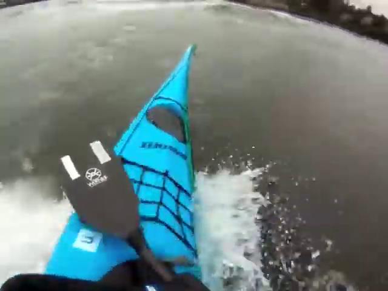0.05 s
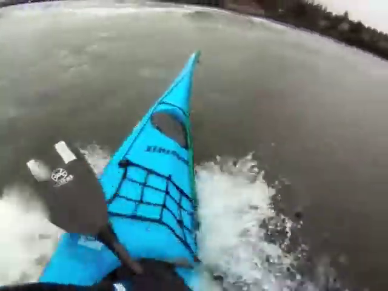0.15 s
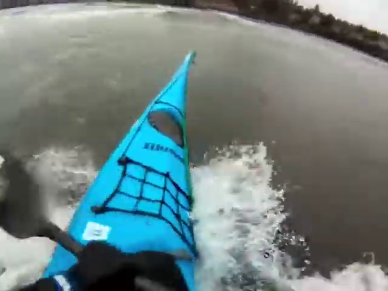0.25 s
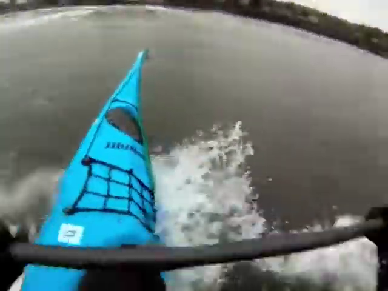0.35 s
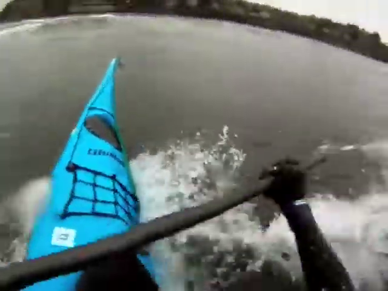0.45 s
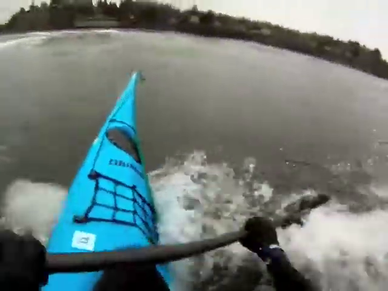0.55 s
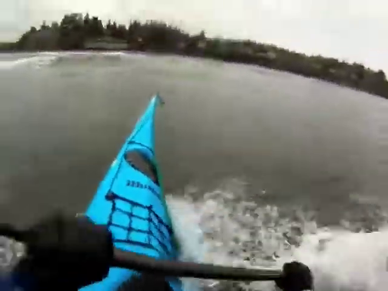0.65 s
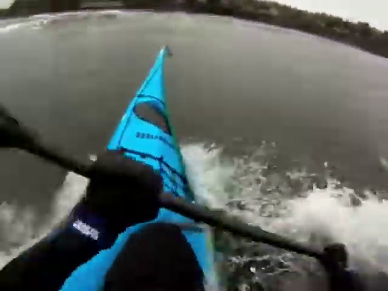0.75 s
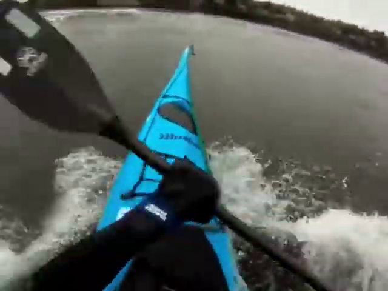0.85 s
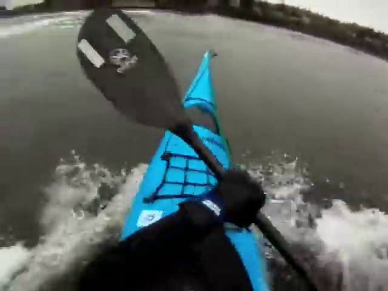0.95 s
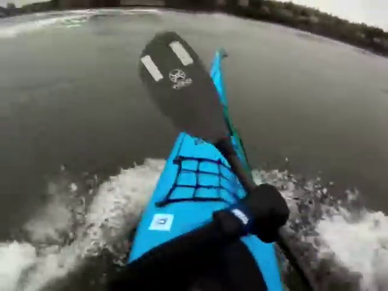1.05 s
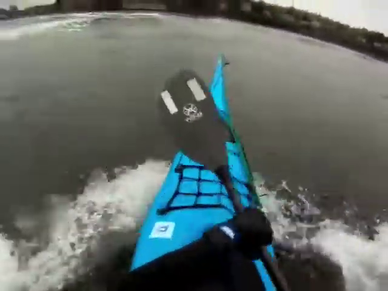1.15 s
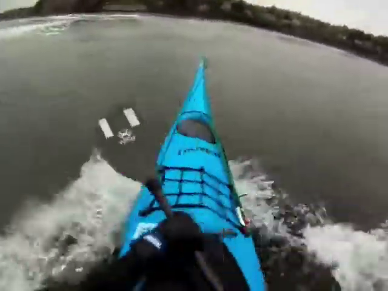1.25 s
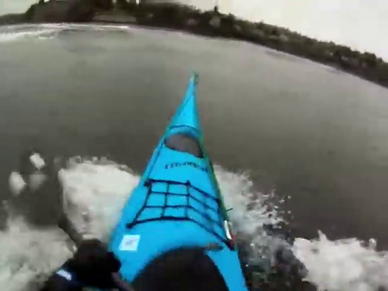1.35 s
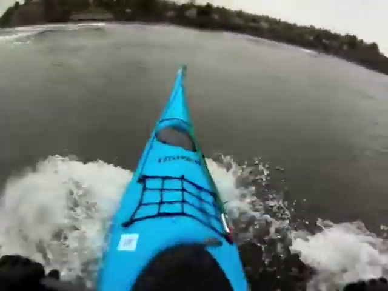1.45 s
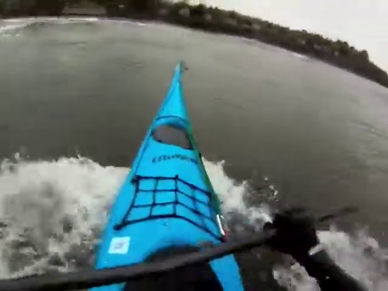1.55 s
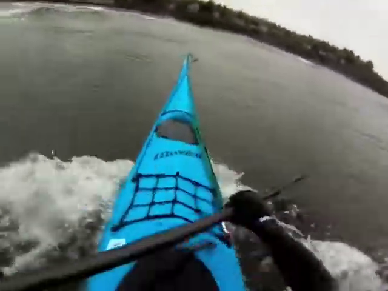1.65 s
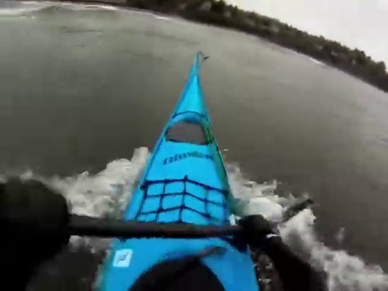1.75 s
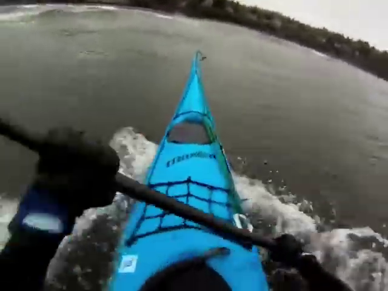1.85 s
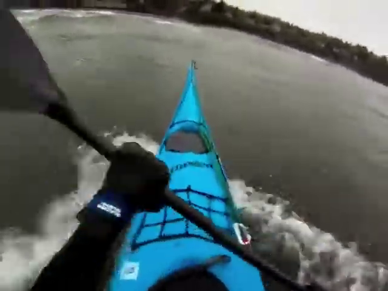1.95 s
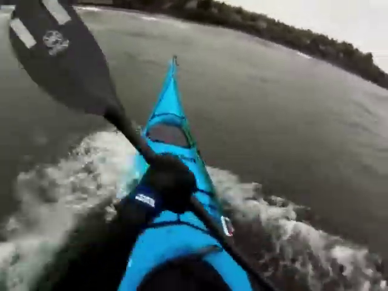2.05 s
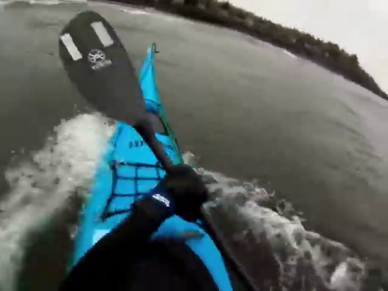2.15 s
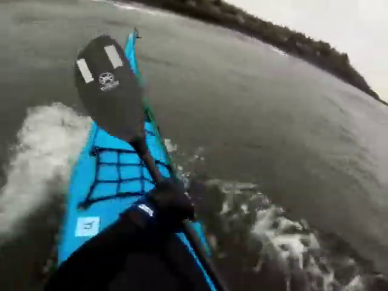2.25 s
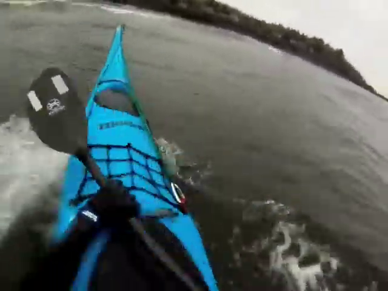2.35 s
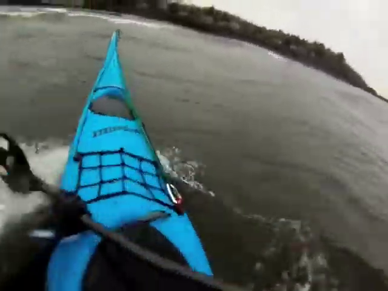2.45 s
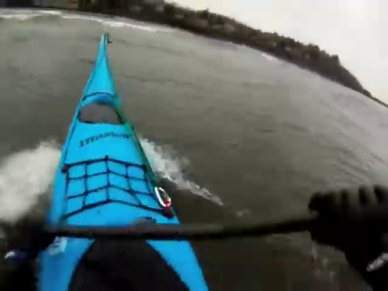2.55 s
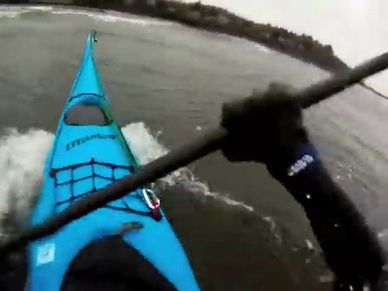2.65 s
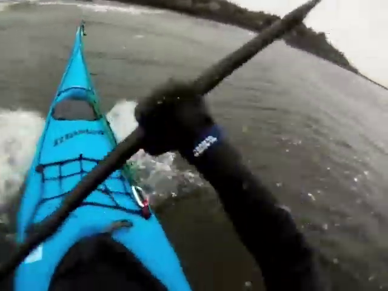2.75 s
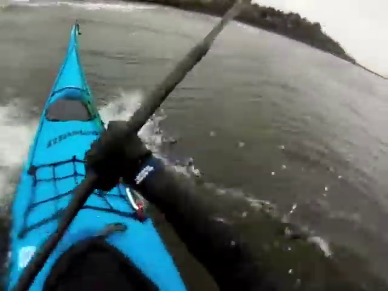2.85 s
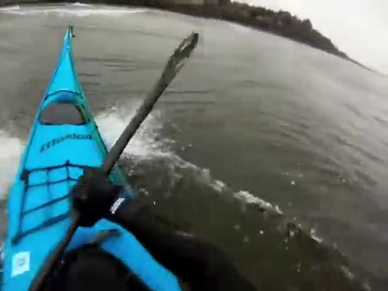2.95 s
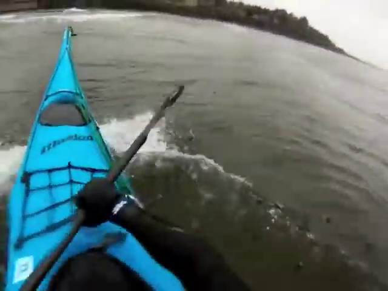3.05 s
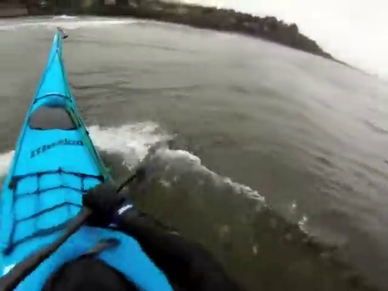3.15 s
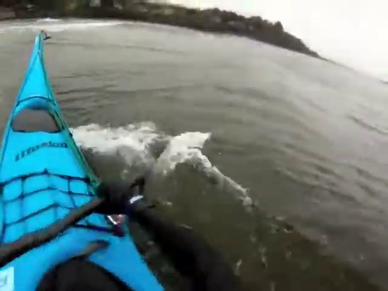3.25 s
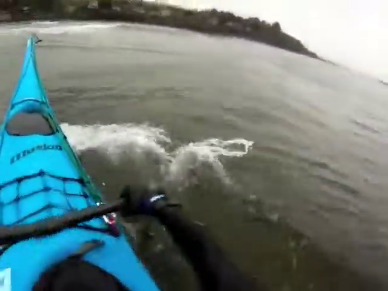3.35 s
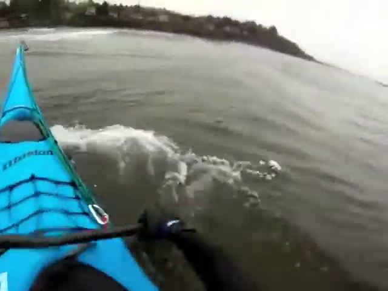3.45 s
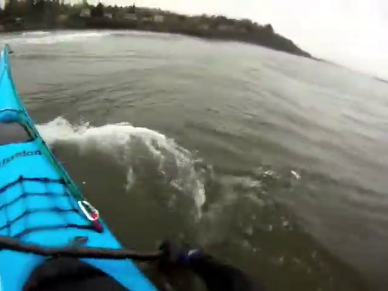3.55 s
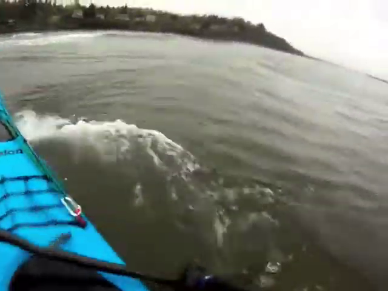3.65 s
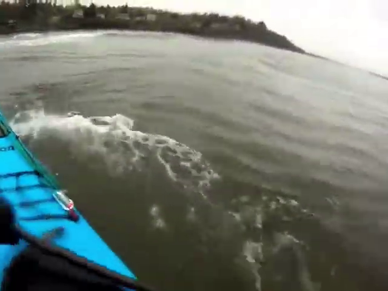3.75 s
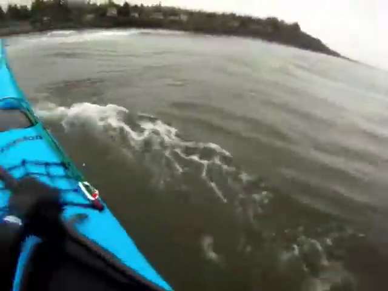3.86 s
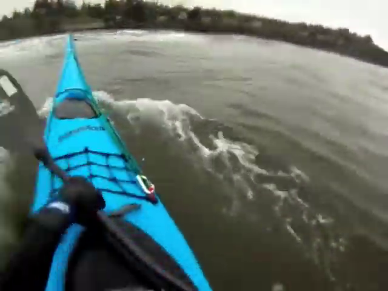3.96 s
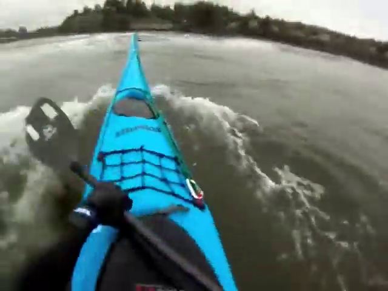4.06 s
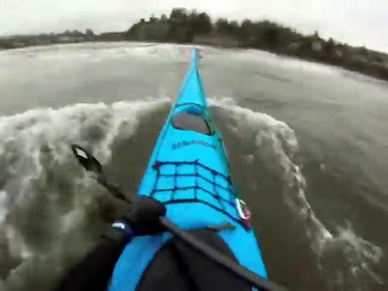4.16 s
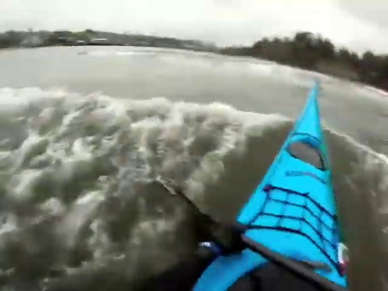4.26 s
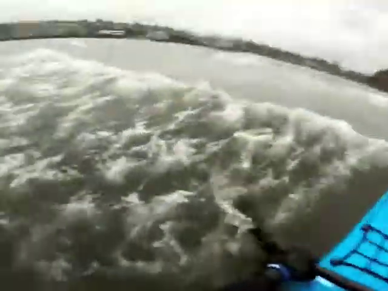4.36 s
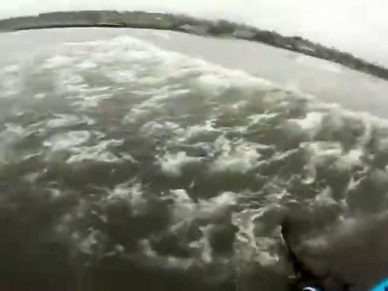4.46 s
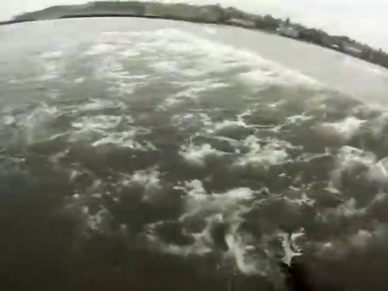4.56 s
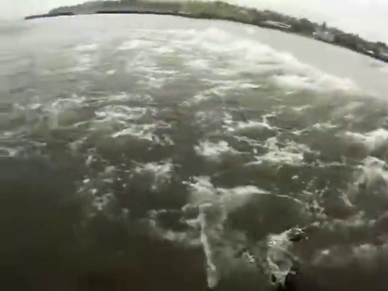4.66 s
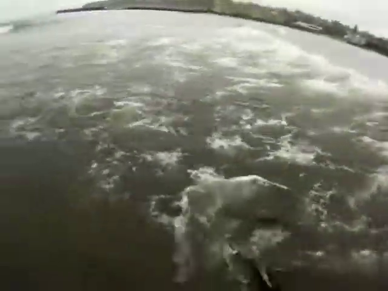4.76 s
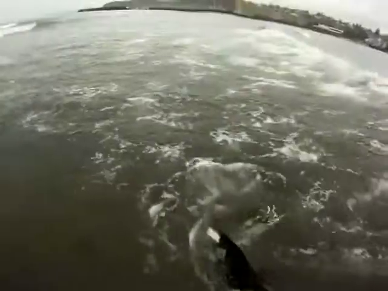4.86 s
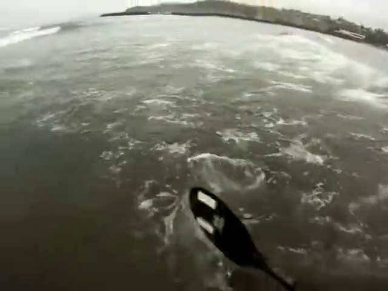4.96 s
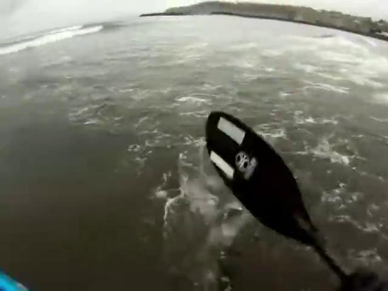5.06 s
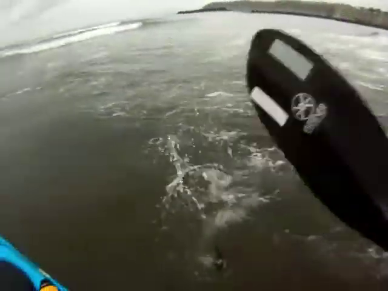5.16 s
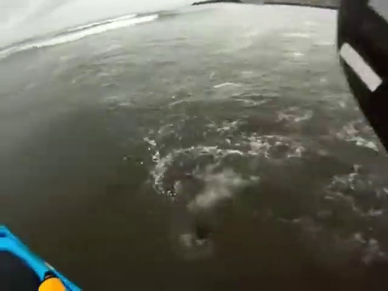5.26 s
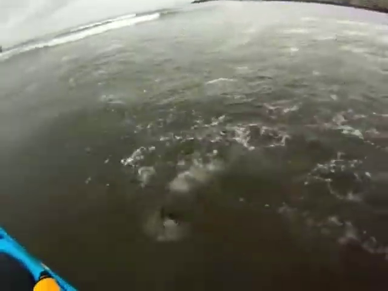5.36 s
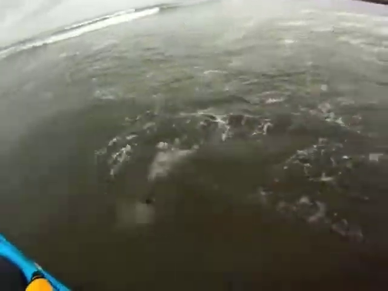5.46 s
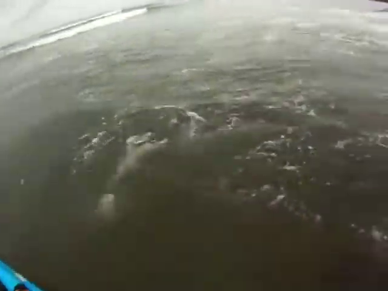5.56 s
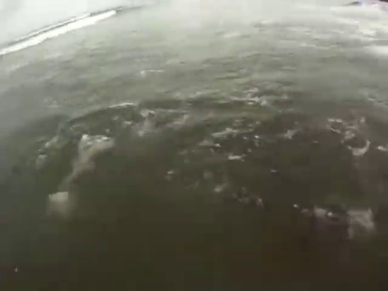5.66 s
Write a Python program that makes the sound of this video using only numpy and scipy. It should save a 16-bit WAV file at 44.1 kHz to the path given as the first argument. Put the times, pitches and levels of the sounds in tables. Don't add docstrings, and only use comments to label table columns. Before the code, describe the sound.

Water rushes continuously along a kayak hull on open water, heard from inside a small sealed camera case. The foam is a mid-pitched, bubbly hiss with finer spray above and a dull wash below, fluttering slightly. It is fullest for the first two and a half seconds, then eases steadily until the end is much quieter. Soft hull slaps lift it, with heavier wash near 1.3 and 4.4 s and spray bursts near 1.6, 2.6 and 3.1 s. Low wind buffets heave and thump, strongest from 0.7 to 1.5 s. Drops tick and splat on the case throughout, with prominent plastic pops around 0.93, 1.03 and 1.44 s. Brief gritty strap rubs come near 0.7, 1.4 and 4.45 s. Dull knocks with deep thuds cluster at 4.35-4.45 s, and a clear bright tap sounds at 5.46 s. The tone is boxy and close, with coarse, metallic-edged digital treble.

```python
import sys
import numpy as np
from scipy import signal
from scipy.fft import rfft, irfft, next_fast_len
from scipy.io import wavfile
from scipy.ndimage import uniform_filter1d, map_coordinates

SR = 44100
rng = np.random.default_rng(int(sys.argv[2]) if len(sys.argv) > 2 else 0)


def output_pcm(signal):
    pcm = np.clip(np.atleast_2d(signal).T, -1, 1) * 32767
    wavfile.write(sys.argv[1], SR, np.round(pcm).astype(np.int16))


def how_loud(loudness_db):
    steps = np.asarray(loudness_db, float) / 20
    return 10 ** steps


N = 251811


def unit(x):
    return x / np.sqrt(np.mean(x ** 2) + 1e-20)


def curves(rows):
    s, *cols = np.transpose(rows)
    return [np.interp(np.arange(N) / SR, s, c) for c in cols]


def wobble(rate_hz):
    knots = rng.standard_normal(int(N * rate_hz / SR) + 4)
    return map_coordinates(knots, [np.arange(N) * rate_hz / SR])


def filtered(x, response):
    m = next_fast_len(N + 8192)
    spectrum = rfft(x, m) * response(np.fft.rfftfreq(m, 1 / SR))
    return unit(irfft(spectrum, m)[:N])


def colour(points):
    f, v = np.transpose(points)
    return lambda hz: how_loud(np.interp(np.log(hz + 1), np.log(f + 1), v))


def steadied(x, power, size):
    return unit(x / (0.15 + uniform_filter1d(abs(x), size=size)) ** power)


def patchy(depth_db):
    z = signal.stft(rng.standard_normal(N), nperseg=256)[2]
    field = uniform_filter1d(rng.standard_normal(z.shape), size=3, axis=0)
    field = uniform_filter1d(field, size=8, axis=1)
    return unit(signal.istft(z * how_loud(depth_db * unit(field)), nperseg=256)[1][:N])


def bubbles(count, centre_hz, spread, cycles, scatter_db):
    u = rng.random((count, 3))
    hz = centre_hz * np.exp(spread * rng.standard_normal(count))
    hz = np.clip(hz, 300, 5500)[:, None]
    t = np.arange(256) / SR
    rising = 1 + 0.11 * hz * t / cycles
    grain = np.sin(2 * np.pi * hz * t * rising) * np.exp(-t * hz / cycles)
    grain *= how_loud(-scatter_db * np.log(u[:, 1:2] + 0.058)) * np.sqrt(hz)
    where = (u[:, :1] * N).astype(int) + np.arange(len(t))
    return unit(np.bincount(where.ravel(), grain.ravel(), N + len(t))[:N])


# frequency in Hz, density in dB per Hz.
FOAM_COLOUR = [(410, -27), (700, -19), (762, -21), (888, -6.5), (1110, -4.5), (1280, -7), (1400, -8),
               (1530, -10.5), (1910, 0), (2440, -1.5), (3000, -11), (3900, -17.5), (6600, -120)]


def foam(level_db):
    x = patchy(depth_db=0.87)
    x = x + 0.23 * bubbles(count=2500, centre_hz=1817, spread=0.47, cycles=2.9, scatter_db=3.5)
    return how_loud(level_db) * filtered(x, colour(FOAM_COLOUR))


# frequency in Hz, density in dB per Hz.
SPRAY_COLOUR = [(1650, -63), (2800, -5), (3610, -2.5), (4100, -11.5), (4510, -7), (4830, -8), (5430, -12.5),
                (5950, -21.5), (7740, -50), (13100, -120)]


def spray(level_db):
    x = patchy(depth_db=0.95)
    x = x + 0.37 * bubbles(count=4000, centre_hz=3650, spread=0.356, cycles=1.18, scatter_db=0.5)
    return how_loud(level_db) * filtered(x, colour(SPRAY_COLOUR))


# frequency in Hz, density in dB per Hz.
WASH_COLOUR = [(76, -9.5), (130, -2.5), (381, -2.5), (569, -5.5), (761, -6.5), (850, -5.5), (1100, -39),
               (1870, -120)]


def wash(level_db):
    return how_loud(level_db + 0.38 * wobble(7)) * filtered(patchy(depth_db=2.04), colour(WASH_COLOUR))


# centre in seconds, length in seconds, spray lift in dB, wash lift in dB.
SLAPS = [
    (0.27, 0.34, 0.5, 0.5),
    (0.65, 0.36, 0, 2),
    (0.85, 0.27, -1, 0),
    (1.29, 0.35, 0.5, 3),
    (1.604, 0.47, 1, -1.5),
    (2.05, .3, -0.5, 1),
    (2.62, 0.21, 2, 0.5),
    (3.102, .3, 2, 0.5),
    (4.39, 0.37, -1.5, 3),
    (5.2, 0.51, -0.5, 1),
]


def slap_lifts_db():
    t = np.arange(N) / SR
    lifts = [np.exp(-((t - s) * 2 / length_s) ** 2) * [[spray_db], [wash_db]]
             for s, length_s, spray_db, wash_db in SLAPS]
    return np.sum(lifts, axis=0)


# time in seconds, strength in dB.
BOW_WAVE = [(0.0, -43), (0.83, -43.5), (0.97, -45), (1.53, -44.5), (2.02, -46), (2.54, -45), (3.07, -46.5),
            (3.28, -48.5), (3.94, -51.5), (4.29, -51), (4.58, -54.5), (5.37, -53.5), (5.71, -55.5)]


def water():
    cruise_db = -48
    wave_db, = curves(BOW_WAVE)
    spray_lift_db, wash_lift_db = slap_lifts_db()
    surge_db = 0.5 * wobble(7.13) + 0.66 * wobble(30)
    spray_db = cruise_db - 5.5 + 0.87 * (wave_db - cruise_db) + spray_lift_db
    wash_db = cruise_db - 11 + 0.5 * (wave_db - cruise_db) + wash_lift_db
    return foam(wave_db + 0.063 + surge_db) + spray(spray_db + surge_db) + wash(wash_db)


# frequency in Hz, density in dB per Hz.
HEAVE_COLOUR = [(4.7, -22), (8.0, 4.5), (22, 8.5), (42, -16), (55, -40), (92, -120)]
# frequency in Hz, density in dB per Hz.
THUMP_COLOUR = [(25, -30), (42, -0.5), (64, -0.5), (118, -16), (170, -21), (220, -59), (370, -120)]
# peak in seconds, heave in dB, thump over heave in dB, length in seconds.
BUFFETS = [(0.042, -46, -6.5, 0.069), (0.162, -42.5, -10, .1), (0.38, -48.5, -7.5, 0.18),
           (0.686, -38, -2.5, 0.13), (0.85, -37, -6, 0.17), (0.962, -33.5, -15, 0.085),
           (1.052, -35.5, -11, 0.052), (1.142, -42.5, -3.5, 0.1), (1.328, -43.5, -4, .1),
           (1.485, -36.5, -10.5, 0.17), (1.682, -47.5, -7, 0.2), (1.95, -40.5, -14, 0.27),
           (2.04, -45, -17, 0.069), (2.18, -48.5, -6, 0.11), (2.388, -44, -11, 0.05),
           (2.47, -38.5, -20, 0.19), (2.64, -51.5, 0.5, .15), (2.86, -43, -10.5, 0.25),
           (3.12, -47, -14, 0.5), (3.427, -44.5, -32, 0.16), (3.72, -52.5, -15, 0.27),
           (4.048, -56.5, 5.5, .08), (4.167, -45.5, -20, 0.082), (4.365, -48.5, 0, 0.071),
           (4.42, -47, -4, .07), (4.538, -44.5, -9, 0.23), (5.102, -56, -3, 0.21),
           (5.287, -47.5, -15, 0.16), (5.388, -47, -13, .18), (5.647, -43, -14, 0.14)]


def wind():
    calm_heave_db, calm_thump_db = -55.5, -63.5
    fall_db = 10
    s, db, thump_db, length_s = np.transpose(BUFFETS)[:, :, None]
    t = np.arange(0, N, 64) / SR
    swell_db = db - fall_db * abs(t - s) * 2 / length_s

    def strength(level_db, calm_db):
        summed = np.sqrt(np.sum(how_loud(level_db) ** 2, axis=0))
        return np.hypot(how_loud(calm_db), np.interp(np.arange(N) / SR, t, summed))

    heave = steadied(filtered(rng.standard_normal(N), colour(HEAVE_COLOUR)), power=1.0, size=3000)
    thump = steadied(filtered(rng.standard_normal(N), colour(THUMP_COLOUR)), power=0.28, size=1500)
    return strength(swell_db, calm_heave_db) * heave + strength(swell_db + thump_db, calm_thump_db) * thump


# frequency in Hz, t60 in seconds.
CASE_MODES = [(1150, 0.013), (1550, 0.011), (2080, 0.011), (2650, 0.0072), (3400, 0.0089), (4050, 0.0044),
              (4750, 0.0046)]


def struck(rows, shape, boost_db, between_db, rise_cycles):
    out, t = np.zeros(N + SR), np.arange(SR // 20) / SR
    chance = rng.standard_normal((len(rows), len(CASE_MODES), 2))
    for (s, levels_db, last), draw in zip(rows, chance):
        at = round(s * SR)
        for k, ((hz, t60_s), level_db, (a, b)) in enumerate(zip(CASE_MODES, levels_db, draw)):
            rise = 1 - np.exp(-t * hz / rise_cycles)
            tone = np.sin(2 * np.pi * hz * (1 + 0.023 * a) * t + 0.2 * b)
            gain = (-1) ** k * how_loud(level_db + boost_db + k % 2 * between_db)
            out[at:at + len(t)] += gain * rise * tone * shape(t, t60_s, last)
    stiff = signal.butter(2, 560, "high", fs=SR, output="sos")
    return signal.sosfilt(stiff, out[:N])


def peaked(db, best_hz, fall_db):
    octaves = np.log2(np.transpose(CASE_MODES)[0] / best_hz)
    return db - fall_db * abs(octaves) ** 1.5 * np.where(octaves > 0, 1.23, 1)


def hard_contact(t, t60_s, ring_factor):
    return how_loud(-60 * t / (t60_s * ring_factor)) + 0.87 * how_loud(-60 * t / 0.0015)


# start in seconds, level in dB, strongest pitch in Hz,
# fall away from it in dB per octave, ring length factor.
TICKS = [(0.57, -28.5, 2010, 11.5, 0.88), (0.64, -46, 1400, 8, 1), (0.7714, -30, 1600, 18, 1.3),
         (0.7869, -38, 2200, 6, 1), (1.5284, -25.5, 1500, 9, 1.6), (1.5981, -29, 1800, 7.5, 1.07),
         (2.005, -37, 1600, 10, 0.77), (2.0467, -38, 1500, 12, .7), (3.0915, -42, 2600, 5, 1.1),
         (3.1228, -33.5, 1800, 10, 1.6), (3.5923, -32, 2620, 22, 1.25), (3.6512, -33, 1290, 6.5, 1.5),
         (4.153, -30.5, 1430, 11, 1.1), (4.205, -42, 2080, 29, 1), (4.5908, -45.5, 2080, 14, .9),
         (4.9524, -35.5, 2180, 13, 1.6), (4.961, -40.5, 1150, 14, 1.2), (5.2247, -39, 2700, 18, 1),
         (5.339, -47, 1800, 12, 1.1)]


def ticks():
    rows = [(s, peaked(*tone), ring_factor) for s, *tone, ring_factor in TICKS]
    return struck(rows, hard_contact, boost_db=3.5, between_db=-2.5, rise_cycles=0.1)


# start in seconds, length in seconds, level in dB,
# change to the end in dB, weight on the low mode in dB.
RUBS = [
    (0.667, .065, -53, -1, 9),
    (0.766, .035, -47, 2, -0.5),
    (1.4, 0.0195, -34, 6.5, -16),
    (1.423, 0.013, -33, -12, -7),
    (2.626, .03, -45, -4, -23),
    (4.445, .019, -34, 1, -5),
    (4.465, 0.049, -34, -12.5, -13.5),
]
# mode shift factor, brightness in dB.
GRIP = [(0.97, -4), (0.914, -3), (1.07, 1), (0.99, -5), (1.03, -4), (1, -15), (1.017, -7)]
# frequency in Hz, width in Hz.
RUB_MODES = [(1922, 290), (1072, 390), (3160, 900), (4940, 2100)]
RUB_BRIGHT_DB = [-8, -21.5]


def rubs():
    out, size = np.zeros(N), SR // 8
    f, t = np.fft.rfftfreq(size, 1 / SR), np.arange(size) / SR
    grit = how_loud(1.3 * wobble(300))
    for (s, length_s, db, change_db, low_db), (shift, bright_db) in zip(RUBS, GRIP):
        at = round(s * SR)
        edge = np.clip(np.minimum(t / 0.0019, (length_s - t) / 0.0022 + 1), 0, 1)
        edge = edge * how_loud(db + change_db * np.minimum(t / length_s, 1))
        tiring_db = low_db - 1.5 * t / length_s
        levels_db = [0, tiring_db, *(np.array(RUB_BRIGHT_DB) + bright_db)]
        for (hz, width_hz), level_db in zip(RUB_MODES, levels_db):
            c = hz * shift
            resonance = (1j * f * width_hz / (c * c - f * f + 1j * f * width_hz)) ** 2
            mode = unit(irfft(rfft(rng.standard_normal(size)) * resonance, size))
            mode = unit(grit[at:at + size] * steadied(mode, power=0.38, size=130))
            out[at:at + size] += edge * how_loud(level_db) * mode
    return out


# start in seconds, level in dB, tilt in dB per octave,
# snap in the top modes in dB, ring length factor.
RIM = [
    (0.7067, -30.5, -4, 4.5, 1.2),
    (0.8528, -42, -5, 7, 1),
    (1.0059, -42, 8, 3.5, 1),
    (2.1515, -33, 2, -2, 1.6),
    (2.3167, -33.5, 3.5, -6, 1.33),
    (2.527, -40.5, -6, 14, 1.2),
    (2.7686, -34.5, 2.5, 5, 0.69),
    (3.0701, -36, -2, -3, 1.35),
    (5.459, -25, 3, 1, 1.19),
    (1.996, -52, 6.5, 11, 0.71),
]
RIM_MODES_DB = [0, -3, -3, 0, 3, -4.5, -3.5]
SNAP_SHARE = [0, 0, 0, 0, 0, .4, 1]


def rim_drops():
    octaves = np.log2(np.transpose(CASE_MODES)[0] / 2000)
    rows = [(s, db + tilt_db * octaves + RIM_MODES_DB + snap_db * np.array(SNAP_SHARE), ring_factor)
            for s, db, tilt_db, snap_db, ring_factor in RIM]
    return struck(rows, hard_contact, boost_db=3.5, between_db=0.5, rise_cycles=0.22)


# start in seconds, peak in dB, pitch
# in Hz.
KNOCKS = [
    (0.737, -36.5, 200),
    (2.631, -39, 380),
    (4.355, -29.5, 320),
    (4.4, -38, 300),
    (4.444, -35, 320),
    (5.457, -43.5, 360),
    (4.356, -28, 49),
    (4.412, -29, 44),
    (2.86, -37.5, 90),
    (1.445, -31.5, 57),
]


def knocks():
    out, t = np.zeros(N + SR), np.arange(SR // 5) / SR
    for s, db, hz in KNOCKS:
        at = round(s * SR)
        t60_s = 0.036 * (320 / hz) ** 0.57
        rise = 1 - np.exp(-t / 0.0016)
        out[at:at + len(t)] += how_loud(db - 2.5 - 60 * t / t60_s) * np.sin(2 * np.pi * hz * t) * rise
    return out[:N]


# start in seconds, level in dB, strongest pitch in Hz,
# fall away from it in dB per octave, contact in ms.
SPLATS = [(0.9165, -33.5, 1150, 11, 2.7), (0.9284, -20, 1670, 21.5, 2.5), (1.0275, -19.5, 1680, 21, 3.2),
          (1.3068, -24, 1640, 17, 2.3), (1.4438, -14.5, 1700, 24, 2.05), (1.4712, -48, 2200, 14, 3.2),
          (2.0643, -37.5, 1150, 10, 4.5), (2.4753, -34.5, 2150, 15, 3.3), (2.6378, -34, 1700, 6, 1.8),
          (2.6711, -30, 2150, 15, 2.95), (3.8587, -28, 2250, 11.5, 3.1), (4.0498, -40, 2100, 19, 4),
          (5.0317, -50, 1950, 18, 4.9), (5.6179, -44.5, 1800, 7, 2.7)]


def splats():
    def soft_contact(t, t60_s, contact_ms):
        press = np.sin(np.pi * np.minimum(t * 1000 / contact_ms, 1)) ** 0.57
        return press + 0.35 * how_loud(-60 * t / (2.2 * t60_s)) * t / 0.0031

    rows = [(s, peaked(*tone), contact_ms) for s, *tone, contact_ms in SPLATS]
    return struck(rows, soft_contact, boost_db=-1.0, between_db=-33, rise_cycles=0.23)


def scene():
    return (water() + wind() + ticks() + rubs() + rim_drops() + knocks() + splats())[None]


def band_limit(x):
    return signal.sosfilt(signal.butter(12, 16610, fs=SR, output="sos"), x)


# frequency in Hz, gain in dB.
BAND_LIMIT = [(11000, -0.5), (11500, -0.5), (12000, 1), (12500, 0), (13000, -0.5), (15250, -1),
              (15350, -34), (15800, -38), (15900, -44), (16550, -44), (16650, -90)]


def record(dry):
    hold_hz = 12000
    slow = signal.resample_poly(dry, hold_hz, SR, axis=1)
    held = np.repeat(slow, repeats=4, axis=1)
    held = signal.resample_poly(held, SR, 4 * hold_hz, axis=1)[:, :N]
    limited = irfft(rfft(held) * colour(BAND_LIMIT)(np.fft.rfftfreq(N, 1 / SR)), N)
    return band_limit(limited)


dry = scene()
out = record(dry)
output_pcm(out)
```